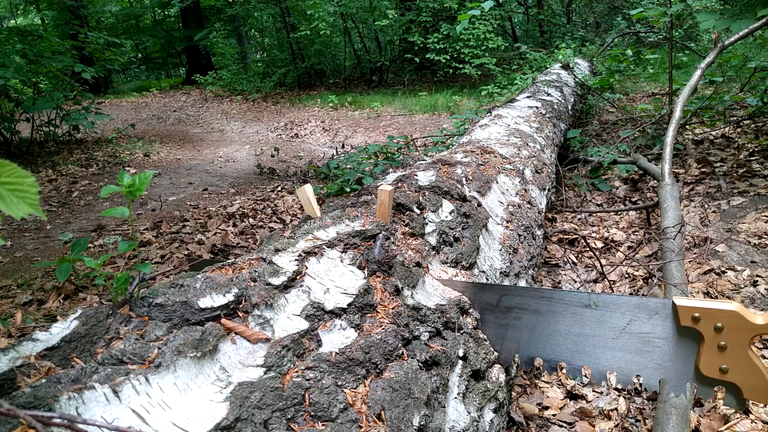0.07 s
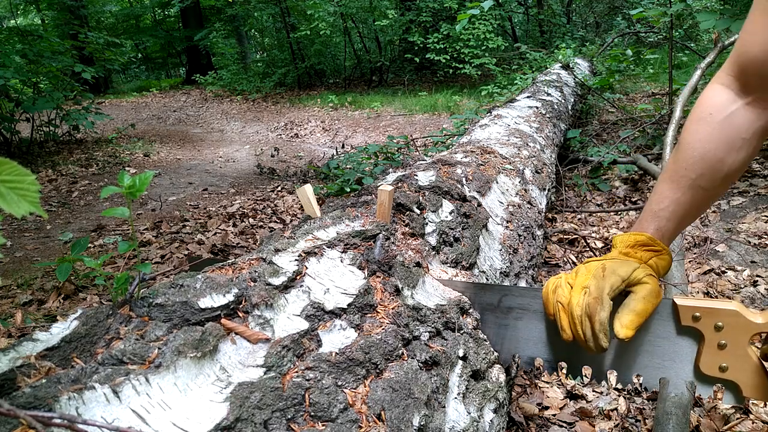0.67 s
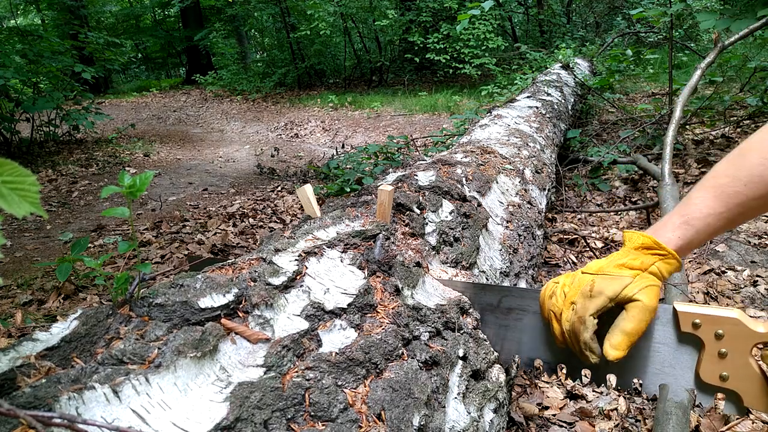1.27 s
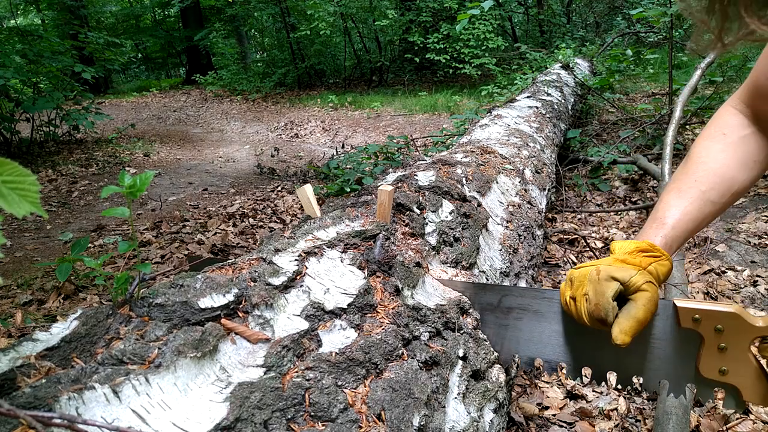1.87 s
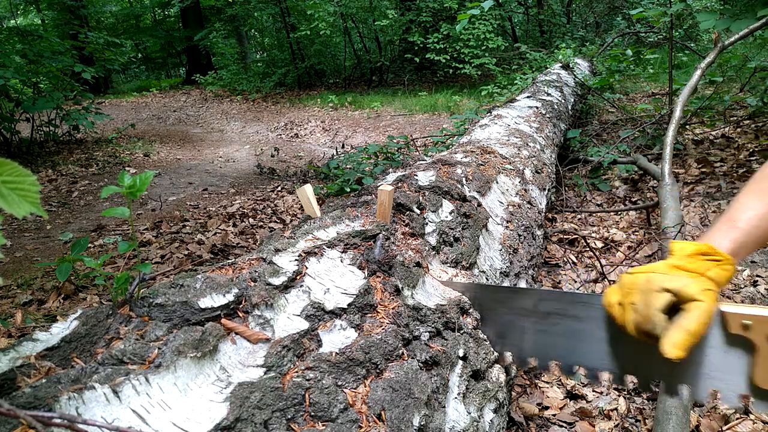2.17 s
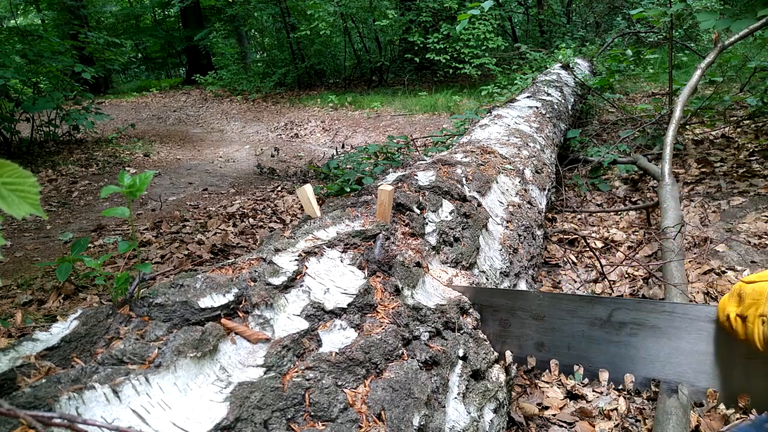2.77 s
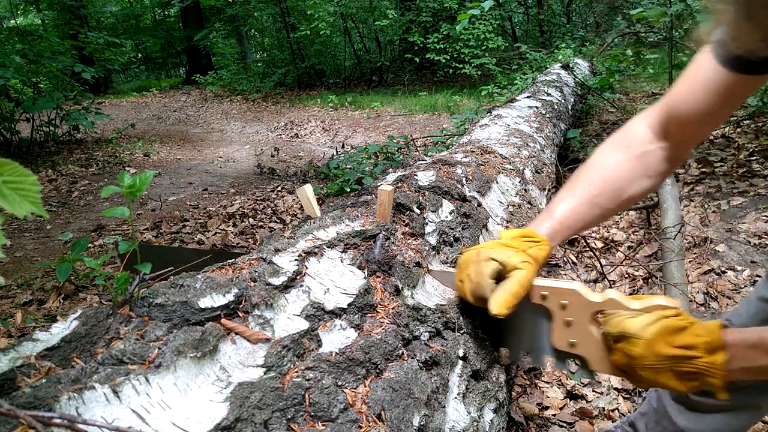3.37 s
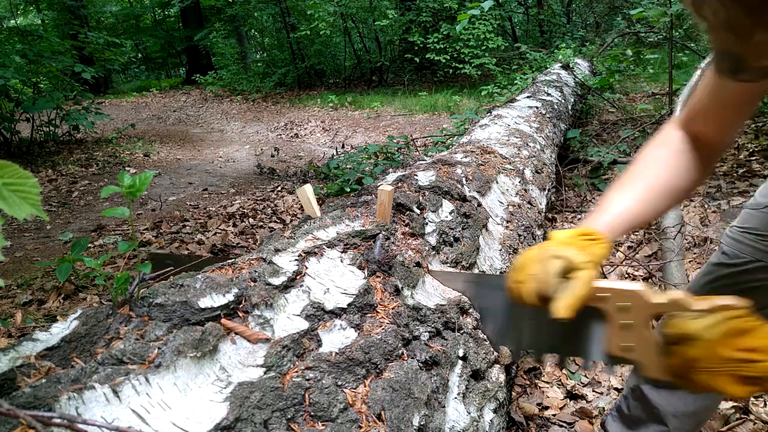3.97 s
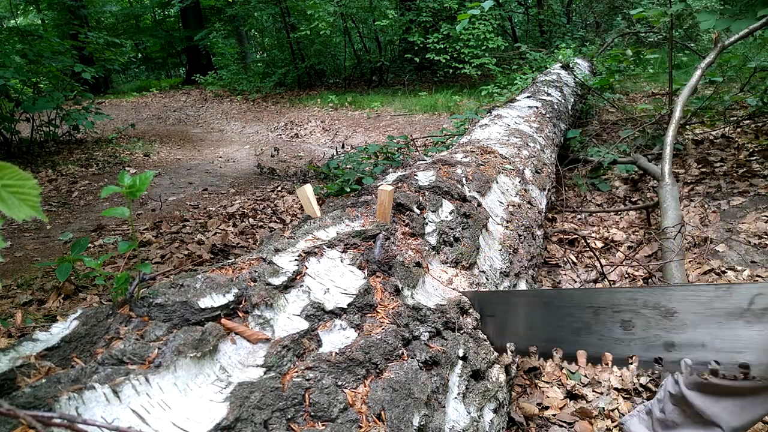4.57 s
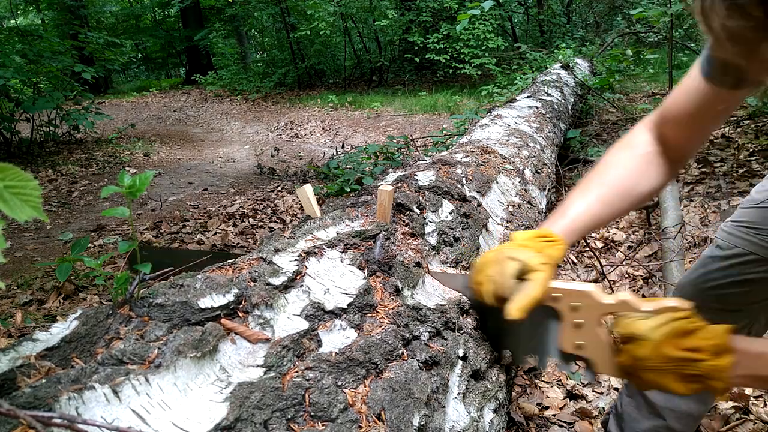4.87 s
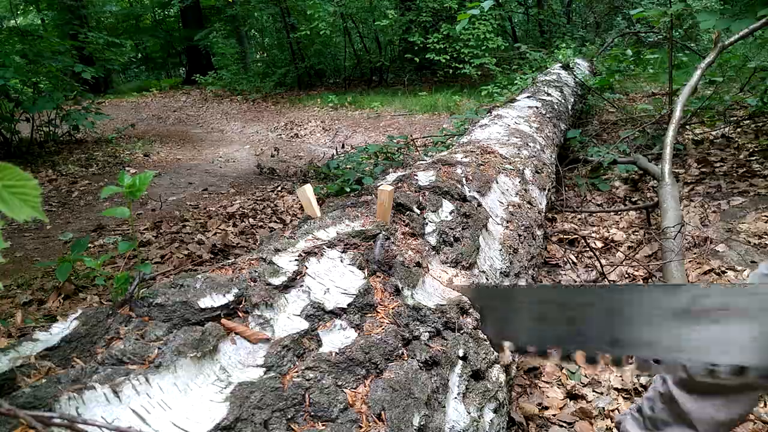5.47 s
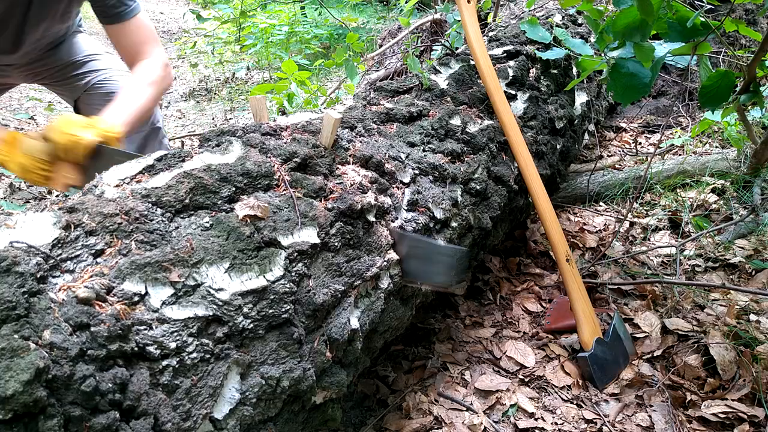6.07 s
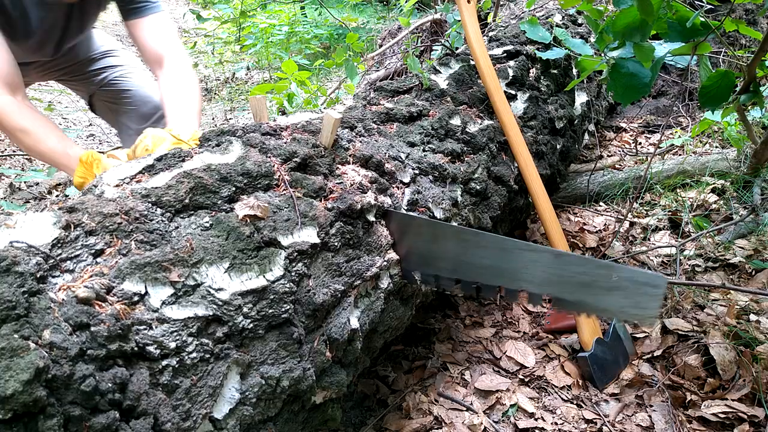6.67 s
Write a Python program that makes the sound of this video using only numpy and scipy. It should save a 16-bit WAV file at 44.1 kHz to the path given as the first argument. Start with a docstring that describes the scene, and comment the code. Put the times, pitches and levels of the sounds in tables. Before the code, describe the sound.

A gloved hand rubs and knocks a saw blade, then saws a log with steady, rasping pushes and pulls in still woods.

```python
"""Sawing a birch log

In a quiet forest, clothes rustle and a glove rubs a crosscut saw's blade and takes the handle.
The saw is pushed and pulled: it sticks, skates, then digs in. Its teeth snap wood fibres that
ring in the steel and in the kerf (the slot being cut). The last two strokes are heard from
the other side of the log."""
import sys
import numpy as np
from scipy import signal
from scipy.fft import rfft, irfft, next_fast_len
from scipy.io import wavfile
from scipy.ndimage import uniform_filter1d

SR = 44100
rng = np.random.default_rng(int(sys.argv[2]) if len(sys.argv) > 2 else 0)


def put_to_file(sound):
    """Save the sound as 16-bit audio at rate SR, in the file named by the first command-line argument."""
    columns = np.atleast_2d(sound).T  # one column per channel
    safe = np.clip(columns, -1, 1)
    whole_steps = np.round(safe * 32767)
    wavfile.write(sys.argv[1], SR, whole_steps.astype(np.int16))


N = 295911

# tone colour of the pushed saw and of the glove on steel: pitch_hz, level_db
PUSH_COLOUR = [(88, -56), (150, -17.5), (279, -7.5), (510, 0), (644, -3), (969, -1), (1220, -2.5),
               (2320, 2), (2510, -4.5), (2820, -1.5), (5250, -9), (5680, -10.5), (7750, -11), (9790, -7),
               (15600, -12)]
GLOVE_COLOUR = [(120, -40), (200, -2.5), (268, -5), (316, -4), (373, 0), (509, 1), (647, 2.5), (1160, -5.5),
                (2650, -2), (4430, -9), (6640, -11), (12600, -3.5), (16000, -5.5)]
# how alike the two ears are near the cut, across the log and for rubs: pitch_hz, likeness (-1 to 1)
NEAR_EARS = [(60, 0.93), (130, 0.95), (290, 0.88), (640, 0.82), (1410, 0.43), (3100, 0.44), (6820, -0.02),
             (15000, -0.51)]
FAR_EARS = [(60, 0.89), (130, 0.98), (290, 0.97), (640, 0.72), (1410, 0.65), (3100, 0.54), (6820, 0.34),
            (15000, -0.03)]
RUB_EARS = [(60, 0.8), (130, 0.92), (290, 0.76), (640, 0.24), (1410, -0.31), (3100, -0.055), (6820, 0.064),
            (15000, -0.15)]


def sawing():
    """Pushes cut hard; pulls cut lighter and clear the dust."""
    # strokes: start_s, rise_s, hold_s, fall_s, dig_after_s, rasp_db, wood_db, hiss_db, kerf_hz,
    # shudder_db (wood and hiss count from the rasp; effort then moves all three)
    pushes = [(1.785, .16, .04, 0.093, .035, -31, -3, -4, 1453, -48.5),
              (3.053, 0.12, 0.054, 0.18, 0.14, -22, -2.5, -1, 1370, -44),
              (3.9, 0.13, 0.07, 0.17, 0.13, -20.5, -4.5, -2, 1730, -42.5),
              (4.752, 0.14, 0.084, 0.13, .134, -20.5, -4.5, -1, 1710, -41),
              (5.567, 0.17, .072, .094, 0.16, -19.5, -5.5, -2, 1630, -42),
              (6.316, 0.13, 0.059, .11, 0.088, -22.5, -7.5, 0.5, 1460, -41.5)]
    pulls = [(2.63, 0.14, 0.11, 0.17, 0.18, -27.5, -7, -3.1, 1340, -40),
             (3.413, 0.25, 0.073, 0.081, 0.18, -25.5, -6.5, -3, 1610, -39),
             (4.264, 0.25, 0.066, 0.12, 0.23, -23.5, -6, -2.5, 1210, -38),
             (5.11, 0.24, 0.038, 0.123, 0.213, -24.5, -6.5, -2.5, 1380.0, -36.5),
             (5.935, 0.082, 0.1, 0.162, 0.09, -28.5, -6.5, 1.7, 1385, -47.5)]
    # tone colours of the other strokes: pitch_hz, level_db
    pull_colour = [(88, -21), (150, -27), (179, -6), (226, -8.5), (420, -0.5), (551, 1.5), (696, -2),
                   (950, 1), (1250, -6), (1990, -3), (3300, -7.5), (4330, -6.5), (6510, -8.5), (9790, -1.5),
                   (15600, -4.5)]
    far_pull_colour = [(88, -58), (150, -25), (205, -13), (414, -10.5), (534, -1), (624, -6), (1450, -2),
                       (2020, -1.5), (3700, -6.5), (4240, -6), (4860, -10), (5360, -9), (16000, -11.5)]
    far_push_colour = [(88, -34), (150, -8), (286, -12.5), (484, -2.5), (637, -7), (923, -3), (1190, -10.5),
                       (1290, -8), (2700, -9), (3490, -11), (8070, -11.5), (11500, -8.5), (16000, -13.5)]
    push = dict(dig_db=6.5, glide=-0.58, bites_per_s=230, bite_db=5, snaps_per_s=8700, spread_db=2)
    pull = dict(dig_db=4.5, glide=0.26, bites_per_s=290, bite_db=3, snaps_per_s=8000, spread_db=2.5)
    near = sum(stroke(row, PUSH_COLOUR, NEAR_EARS, ring_db=-6, kerf_db=4.5, stick_s=0.028, **push)
               for row in pushes[:-1])
    near += sum(stroke(row, pull_colour, NEAR_EARS, ring_db=-10, kerf_db=5.5, **pull)
                for row in pulls[:-1])
    far = stroke(pulls[-1], far_pull_colour, FAR_EARS, ring_db=-12, kerf_db=8.5, **pull)
    far += stroke(pushes[-1], far_push_colour, FAR_EARS, ring_db=-14, kerf_db=12, **push)
    far_side_s = 5.86
    left, right = near * (np.arange(N) / SR < far_side_s)
    return np.array([np.roll(left, 1), right]) + far   # the near cut reaches the right ear first


def stroke(row, colour, likeness, ring_db, kerf_db, dig_db, glide,
           bites_per_s, bite_db, snaps_per_s, spread_db, stick_s=0):
    """One push or pull: the teeth tear clusters of fibres, more often the harder the saw cuts."""
    start_s, rise_s, hold_s, fall_s, dig_after_s, rasp_db, wood_db, hiss_db, kerf_hz, shudder_db = row
    at, speed = arm_motion(start_s, rise_s, hold_s, fall_s)
    travel = np.cumsum(speed) / speed.sum()   # 0 to 1 along the stroke
    effort_db = effort(at / SR, speed, start_s + stick_s, start_s + dig_after_s, dig_db)
    cutting = from_db((effort_db - effort_db.max()) / 2)
    grip = tooth_grip(bites_per_s * cutting, bite_db)
    fibres = blade_echo(snaps(snaps_per_s * cutting, spread_db) * grip, travel)
    tearing = two_ears(fibres + splinters(cutting), likeness)
    # the kerf's note sinks as the saw slows, glides with the blade and wanders with the uneven grain
    centre_hz = kerf_hz * (1 - 0.33 * (1 - speed))
    centre_hz *= 1 + glide * (travel - 0.5) + 0.3 * waver(len(at), per_s=22.2)
    tearing = kerf_ring(blade_ring(tearing, ring_db), centre_hz, width_hz=300, boost_db=kerf_db)
    # the hollow wood tone grows along the stroke and flutters with the grain
    wood_db = wood_db + 3 * (travel - 0.5) + 1.74 * waver(len(at), per_s=44.6)
    # wood tone and hiss follow the effort less than the rasp does
    scrape = mix_bands(coloured(tearing, colour), rasp_db + effort_db,
                       wood_db - 0.25 * effort_db, hiss_db - 0.1 * effort_db)
    stuck = fade_past(at / SR, start_s + stick_s, length_s=0.011)
    moving = np.tanh(speed / 0.19)   # near rest the teeth stop cutting
    out = np.zeros((2, N))
    out[:, at] = moving * from_db(-7 * stuck) * scrape + shudder(speed, shudder_db)
    return out


def effort(time_s, speed, free_s, dig_s, dig_db):
    """How hard the saw cuts, in dB: it jerks free, skates, digs in and catches in tougher wood."""
    # tough spots in the wood: time_s, extra_db
    catches = [(1.985, 1), (2.91, 0), (3.15, 2), (3.24, 3), (3.335, -1), (3.659, 2.5), (4.056, 2.5),
               (4.37, 1.5), (4.905, 2), (5.36, 1), (5.41, 3.5), (5.462, 3), (5.745, 2.5), (6.045, 4),
               (6.155, 6), (6.455, 2.5)]
    catch_s, jerk_s, speed_range_db = 0.022, 0.023, 31.5
    stuck = fade_past(time_s, free_s, length_s=0.011)
    skating = fade_past(time_s, dig_s, length_s=0.023)
    caught_db = sum(db * np.exp(-((time_s - s) / catch_s) ** 2) for s, db in catches)
    jerk_db = 3 * (1 - stuck) * np.exp(-np.abs(time_s - free_s) / jerk_s)
    return caught_db + jerk_db - speed_range_db * (1 - speed) - dig_db * skating


def tooth_grip(bites_per_s, bite_db):
    """Teeth bite and slip unevenly: a flickering gain whose average power stays steady."""
    count = len(bites_per_s)
    bites = (rng.random(count) < bites_per_s / SR) * rng.uniform(0.12, 1, count)
    load = die_away(bites, decay_s=0.0008)   # a tooth soon lets go
    grip = from_db(bite_db * np.tanh(load) + 1.13 * waver(count, per_s=70.5))
    return grip / np.sqrt(uniform_filter1d(grip ** 2, size=SR // 25))


def snaps(per_s, spread_db):
    """Two streams of tiny random breaks or slips, uneven in size, with the same power at any rate."""
    shape = (2, len(per_s))
    chance = np.clip(per_s / SR, 1e-4, 1)
    sizes = from_db(spread_db * np.minimum(rng.exponential(1, shape), 4))
    return (rng.random(shape) < chance) * rng.choice([-1, 1], shape) * sizes / np.sqrt(chance)


def splinters(cutting):
    """Now and then a whole chip of wood breaks out."""
    # tone colour of a chip: pitch_hz, level_db
    chip_colour = [(200, -1.5), (600, 1.5), (2800, -9), (5500, -26), (12000, 5)]
    return from_db(-7) * coloured(snaps(per_s=130 * cutting, spread_db=2), chip_colour)


def blade_echo(x, travel, fade_s=0.018, edge_hz=3200, places=7):
    """Bending waves bounce along the steel; their pattern changes with the blade's free length."""
    age_s = np.arange(SR // 40) / SR
    echoes = 0
    for place in range(places):
        bounces = rng.standard_normal(len(age_s)) * from_db(-60 * age_s / fade_s)
        bounces /= np.linalg.norm(bounces)
        bounces = filtered(bounces, lambda hz: hz ** 2 / (hz ** 2 + edge_hz ** 2))   # keep the treble
        nearness = np.sqrt(np.clip(1 - np.abs(travel * (places - 1) - place), 0, 1))
        echoes += nearness * signal.fftconvolve(x, bounces[None], axes=1)[:, :x.shape[1]]
    return x + echoes


def blade_ring(x, ring_db):
    """Log and blade ring at their own pitches, which stand out of the tearing."""
    # ringing notes: pitch_hz, width_hz, level_db (added to ring_db)
    notes = [(527, 72, 7.5), (1025, 22, -4), (1600, 220, 0.5), (2490, 140, 6.5), (2750, 630, 8.5),
             (3560, 130, -1), (3910, 120, 6), (4230, 92, 9), (4760, 130, -2), (5750, 46, 13),
             (7070, 120, 6), (6560, 26, 14.5), (7360, 61, -12), (9500, 87, 9.5), (10270, 120, 7),
             (14900, 400, 9)]

    def response(hz):
        peaks = sum(from_db(ring_db + db) ** 2 / (1 + (2 * (hz - pitch_hz) / width_hz) ** 2)
                    for pitch_hz, width_hz, db in notes)
        return np.sqrt(1 + peaks)
    return filtered(x, response)


def kerf_ring(x, centre_hz, width_hz, boost_db):
    """The hollow of the cut boosts a band of sound that glides with the blade."""
    turn = np.exp(2j * np.pi * np.cumsum(centre_hz) / SR)
    decay = np.exp(-np.pi * width_hz / SR)
    band = turn * signal.lfilter([1 - decay], [1, -decay], x / turn)   # shift to 0 Hz, smooth, shift back
    return x + from_db(boost_db) * band.real


def shudder(speed, level_db):
    """Jerks of the saw shake the heavy log, more at higher speed."""
    # tone colour of the shaking log: pitch_hz, level_db
    log_colour = [(40, -7.5), (80, 1.5), (120, -1.5), (200, -6), (300, -6), (600, -19.5), (3000, -43)]
    jerks = two_ears(snaps(np.full(len(speed), 500), spread_db=-2), NEAR_EARS)
    return from_db(level_db) * speed ** 0.93 * unit_level(coloured(jerks, log_colour))


def tooth_snags():
    """Teeth snag as the stroke turns round, and the blade rings briefly."""
    # snags: time_s, level_db (before the boost)
    snags = [(3.0565, -27.5), (3.0697, -26.5)]
    # their tone colour: pitch_hz, level_db
    snag_colour = [(500, -35), (1100, -7), (1650, -3), (2200, -13), (3500, -22), (12000, -23)]
    return knocks(snags, snag_colour, fade_s=0.072, boost_db=3)


def blade_shifts():
    """The blade shifts in the kerf before a push."""
    # small scrapes: start_s, swell_s, fade_s, level_db, hollow_db, hiss_db
    shifts = [(3.83, 0.058, 0.021, -57, 4, -1), (4.69, .045, .025, -54, 3.5, -5),
              (5.525, .035, 0.019, -52, 2, -6)]
    return rubs(shifts, PUSH_COLOUR, slips_per_s=4000, spread_db=2.2, patchy_db=2.5)


def handling_clacks():
    """A dull knock of clothing, then sharp ticks and short rattles as the saw is handled and moved."""
    # touches: time_s, level_db (before a 2.5 dB cut), treble_db, fade_s
    touches = [(0.29, -32, -17, .16), (0.7223, -32, 11, 0.04), (0.8133, -31, -2, 0.04),
               (1.026, -9, 22, 0.035), (1.0778, -18, 1, 0.044), (1.1907, -25, -3.5, 0.04),
               (1.6487, -19, 6, 0.05), (2.2692, -13.5, 6, 0.056), (2.291, -18, -10, .06),
               (2.3505, -8.5, 3, 0.12), (2.538, -16, 7, 0.1), (2.678, -10.5, 2, 0.04),
               (2.7222, -8.5, 5, 0.06), (3.0326, -21, 12, 0.04), (3.93, -30, -14, 0.081),
               (4.78, -27.5, 19, 0.054), (5.5934, -33, 0, 0.06)]
    out = np.zeros((2, N))
    for time_s, level_db, treble_db, fade_s in touches:
        at, rattle = burst(time_s, fade_s)
        _, tick = burst(time_s, fade_s=0.013)
        clack = coloured(two_ears(tick + 0.5 * rattle, FAR_EARS), GLOVE_COLOUR)
        clack = coloured(clack, [(2500, 0), (9000, treble_db)])
        out[:, at] += from_db(level_db - 2.5) * clack / np.abs(clack).max()
    return out


def dull_bumps():
    """Dull bumps: the hand against blade and handle, and the saw jerking as each pull starts."""
    # bumps: time_s, level_db (before the boost)
    bumps = [(1.19, -48), (2.291, -30.5), (2.345, -34), (2.675, -29.5), (3.465, -36), (4.335, -31),
             (4.362, -27.5)]
    # their tone colour: pitch_hz, level_db
    bump_colour = [(60, -42), (130, 7.5), (220, 6), (400, -0.5), (800, -31), (2000, -14), (8000, -60)]
    return knocks(bumps, bump_colour, fade_s=0.075, boost_db=3.5)


def glove():
    """The glove slides on the steel and takes the handle."""
    # slides: start_s, swell_s, fade_s, level_db, hollow_db, hiss_db
    slides = [(.83, 0.037, .035, -56, -8, -18), (0.911, 0.032, .06, -53.5, 4, -5),
              (.9, 0.15, 0.28, -48.5, -3, 6), (.965, 0.14, 0.039, -43, -7, 9),
              (1.165, .036, .017, -42, 0, 3), (1.156, 0.092, 0.18, -50, -1, 2.5),
              (1.338, 0.092, 0.091, -41, -8.5, 6), (1.436, 0.07, .42, -51.5, -7, 4.5),
              (1.636, 0.011, 0.041, -45, -13, -5), (2.049, 0.15, .096, -47.5, -10.5, 5),
              (2.197, 0.086, 0.075, -42.5, -19, 5.5), (2.334, 0.019, .15, -41.5, -3, 4),
              (2.442, 0.12, .18, -48.5, -5.5, 7), (2.65, .047, .049, -52, -2, 2)]
    return rubs(slides, GLOVE_COLOUR, slips_per_s=9000, spread_db=2.6, patchy_db=1.4)


def clothes():
    """Cloth slides in slips so dense that they blur into a rustle."""
    # rustles: start_s, swell_s, fade_s, level_db, hollow_db, hiss_db
    rustles = [(-0.021, 0.088, 0.19, -44.9, -9.0, 3), (0.189, 0.086, 0.19, -61, 4.5, 7.5),
               (0.409, 0.068, 0.059, -49.5, -8, -1), (0.488, 0.065, 0.054, -51, -20, 0.5)]
    # their tone colour: pitch_hz, level_db
    cloth_colour = [(150, -29), (250, 1.5), (330, -15), (414, -5), (788, -8), (1020, -14), (1160, -8.5),
                    (2760, -1.5), (4410, -14), (5830, -7), (6820, -11), (12800, -0.5), (16000, -13)]
    return rubs(rustles, cloth_colour, slips_per_s=14000, spread_db=-0.5, patchy_db=1)


def leaf_crackles(per_s, level_db):
    """Dry leaves and crumbs of bark tick faintly as the person sawing shifts."""
    # tone colour of a tick: pitch_hz, level_db
    leaf_colour = [(500, -20), (2000, -8), (5000, -10), (10000, -2), (16000, 0)]
    ticks = (rng.random(N) < per_s / SR) * rng.uniform(0.2, 1, N)
    spray = die_away(ticks, decay_s=0.0012) * rng.standard_normal((2, N))
    return from_db(level_db) * coloured(spray, leaf_colour)


def forest_air(level_db):
    """Still forest air: a steady low rumble with a faint hiss."""
    # tone colour of the air: pitch_hz, level_db
    air_colour = [(12, -24), (20, 5), (68, 6), (204, -7.5), (698, -16.5), (802, -13), (1150, -15.5),
                  (2600, -16), (4060, -21.5), (5230, -20.5), (6010, -27), (10200, -22.5), (14700, -25),
                  (16000, -23)]
    noise = two_ears(rng.standard_normal((2, N)), RUB_EARS)
    return from_db(level_db) * unit_level(coloured(noise, air_colour))


def rubs(rows, colour, slips_per_s, spread_db, patchy_db):
    """Cloth, leather or steel slides in many tiny slips that come in patches."""
    out = np.zeros((2, N))
    for start_s, swell_s, fade_s, level_db, hollow_db, hiss_db in rows:
        at, speed = arm_motion(start_s, swell_s, 0, fade_s)
        slips = snaps(np.full(len(at), slips_per_s), spread_db)
        slips *= from_db(patchy_db * waver(len(at), per_s=119.75))
        scrape = coloured(two_ears(slips, RUB_EARS), colour)
        out[:, at] += speed ** 1.47 * mix_bands(scrape, level_db, hollow_db, hiss_db)
    return out


def knocks(events, colour, fade_s, boost_db):
    """Short contacts that all die away in the same tone colour."""
    out = np.zeros((2, N))
    for time_s, level_db in events:
        at, noise = burst(time_s, fade_s)
        knock = coloured(two_ears(noise, NEAR_EARS), colour)
        out[:, at] += from_db(level_db + boost_db) * knock / np.abs(knock).max()
    return out


def burst(time_s, fade_s):
    """Sample numbers and two streams of noise for one touch, falling 60 dB in fade_s."""
    age = np.arange(SR // 5)
    return int(time_s * SR) + age, rng.standard_normal((2, len(age))) * from_db(-60 * age / SR / fade_s)


def arm_motion(start_s, rise_s, hold_s, fall_s):
    """Sample numbers and speed (0 to 1) of an arm that speeds up, holds and comes to rest."""
    end_s = start_s + rise_s + hold_s + fall_s
    at = np.arange(max(int(start_s * SR), 0), min(int(end_s * SR), N))
    ramp = np.minimum((at / SR - start_s) / rise_s, (end_s - at / SR) / fall_s)
    return at, np.sin(np.pi / 2 * np.clip(ramp, 1e-3, 1))


def mix_bands(x, rasp_db, hollow_db, hiss_db, low_hz=1200, high_hz=5000):
    """Split a scrape into hollow lows, rasp and hiss; lows and hiss are set relative to the rasp."""
    def below(hz, edge_hz):
        return 1 / (1 + (hz / edge_hz) ** 10)
    hollow = unit_level(filtered(x, lambda hz: np.sqrt(below(hz, low_hz))))
    upper = filtered(x, lambda hz: np.sqrt(1 - below(hz, low_hz)))
    rasp = unit_level(filtered(upper, lambda hz: np.sqrt(below(hz, high_hz))))
    hiss = unit_level(filtered(upper, lambda hz: np.sqrt(1 - below(hz, high_hz))))
    return from_db(rasp_db) * (rasp + from_db(hollow_db) * hollow + from_db(hiss_db) * hiss)


def two_ears(pair, likeness):
    """Two unrelated signals become left and right: alike in the bass, apart in the treble."""
    # how much louder the left ear is: pitch_hz, left_minus_right_db
    lean = [(60, 1.5), (110, 3), (200, 4), (380, 2), (700, 2.5), (1290, 1.5), (2380, 0), (4400, 1.0),
            (8120, 0.5), (15000, -2)]
    count = pair.shape[-1]
    size = 2 * next_fast_len(count // 2 + 1)
    mid, side = rfft(pair, size)
    hz = np.arange(len(mid)) * SR / size
    sign = np.array([[1], [-1]])
    alike = np.clip(at_hz(likeness, hz), -0.98, 0.98)
    ears = np.sqrt(1 + alike) * mid + sign * np.sqrt(1 - alike) * side
    return irfft(ears * from_db(sign * at_hz(lean, hz) / 2), size)[:, :count]


def coloured(x, colour):
    """Give x a tone colour from rows of pitch_hz, level_db."""
    return filtered(x, lambda hz: from_db(at_hz(colour, hz)))


def filtered(x, response):
    """Filter x with the gain response(hz), so that it rings only after a sound (minimum phase)."""
    count = x.shape[-1]
    size = 2 * next_fast_len(count // 2 + SR // 10)
    hz = np.arange(size // 2 + 1) * SR / size
    cepstrum = irfft(np.log(response(hz) + 1e-6))
    cepstrum[1:size // 2] *= 2   # fold the late half onto the early half
    cepstrum[size // 2 + 1:] = 0
    return irfft(rfft(x, size) * np.exp(rfft(cepstrum)))[..., :count]


def at_hz(points, hz):
    """Read between a table's rows on a scale of octaves."""
    known_hz, value = np.transpose(points)
    return np.interp(np.log(hz + 1), np.log(known_hz), value)


def waver(count, per_s):
    """A random curve with a spread near 1 that turns per_s times a second."""
    return np.interp(np.arange(count) * per_s / SR, np.arange(SR // 4), rng.standard_normal(SR // 4))


def fade_past(time_s, middle_s, length_s):
    """A straight fade from 1 to 0 around middle_s."""
    return np.clip((middle_s - time_s) / length_s + 0.5, 0, 1)


def die_away(clicks, decay_s):
    """Give each click a fading tail."""
    return signal.lfilter([1], [1, -np.exp(-1 / (decay_s * SR))], clicks)


def unit_level(x):
    """Scale a stereo pair so that its centre has an average power of 1."""
    return x / np.sqrt(np.mean(x.mean(0) ** 2) + 1e-20)


def from_db(db):
    """Decibels to gain."""
    return 10 ** (np.asarray(db) / 20)


def scene():
    """Handling and sawing over the still air of the forest."""
    handling = clothes() + glove() + blade_shifts() + dull_bumps() + tooth_snags() + handling_clacks()
    background = leaf_crackles(per_s=4.6, level_db=-43) + forest_air(level_db=-46.5)
    return sawing() + handling + background


def record(dry):
    """The highest peaks are clipped, and the very top of the treble is cut steeply."""
    cutoff_hz = 15900
    low_pass = signal.ellip(12, 0.1, 80, cutoff_hz, fs=SR, output="sos")
    return signal.sosfilt(low_pass, np.clip(dry, -0.85, 0.85))


dry = scene()
out = record(dry)
put_to_file(out)
```